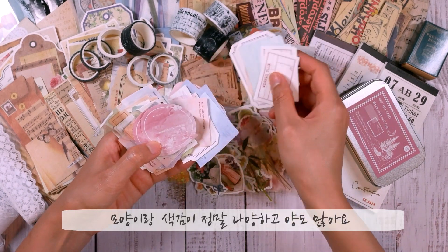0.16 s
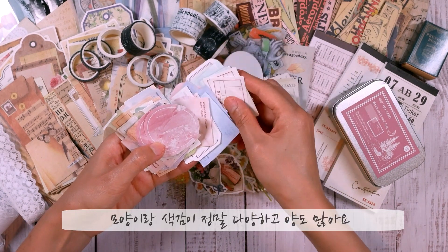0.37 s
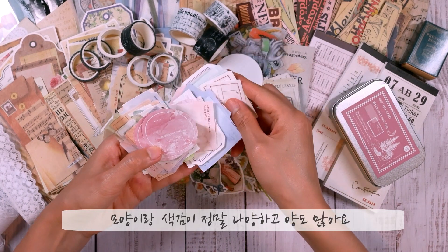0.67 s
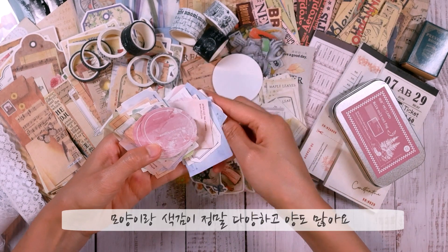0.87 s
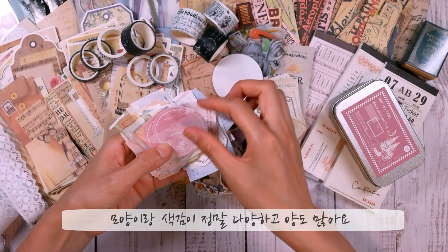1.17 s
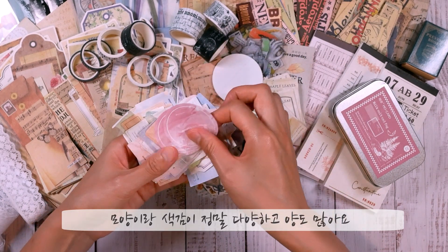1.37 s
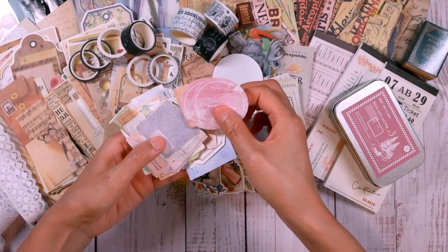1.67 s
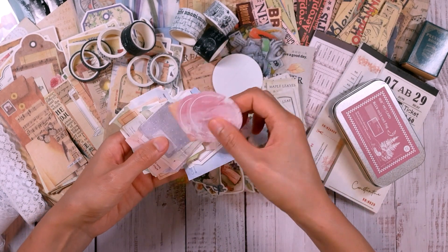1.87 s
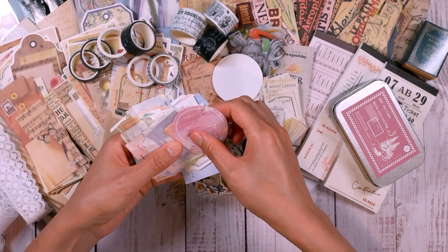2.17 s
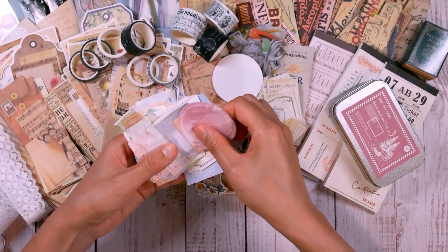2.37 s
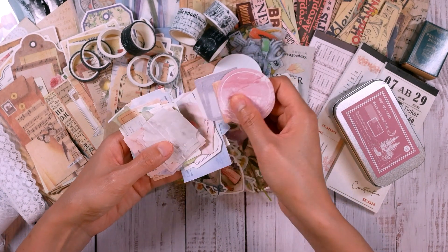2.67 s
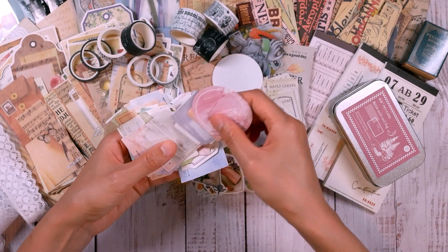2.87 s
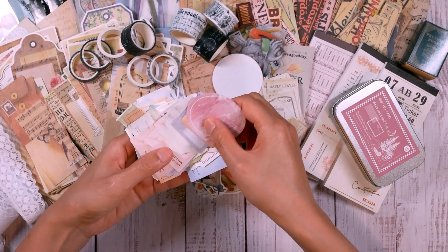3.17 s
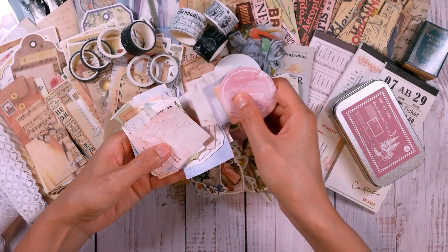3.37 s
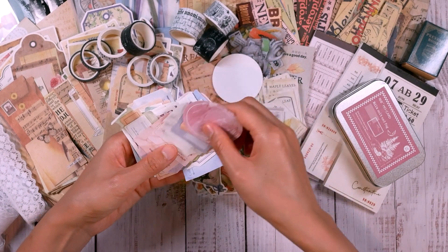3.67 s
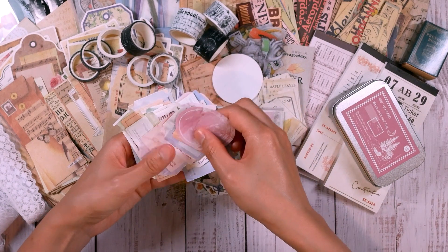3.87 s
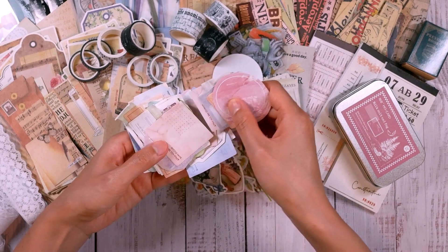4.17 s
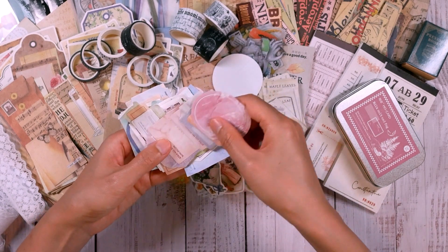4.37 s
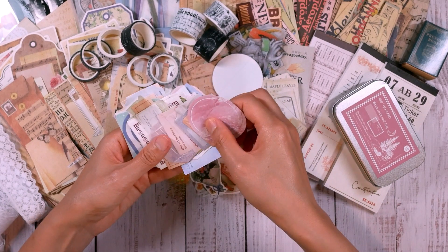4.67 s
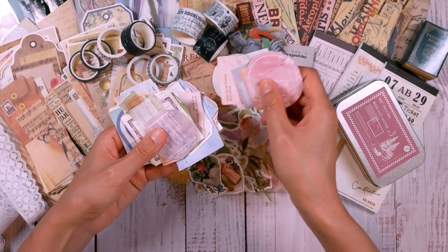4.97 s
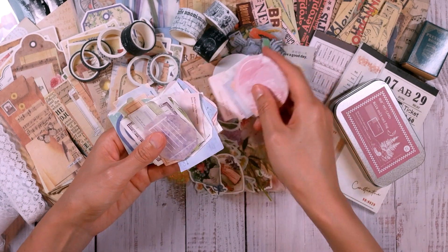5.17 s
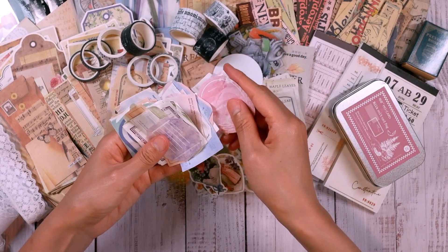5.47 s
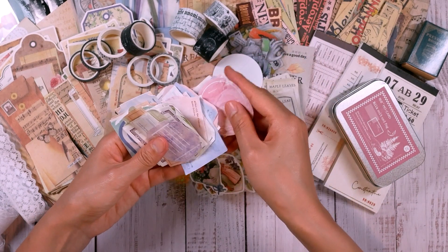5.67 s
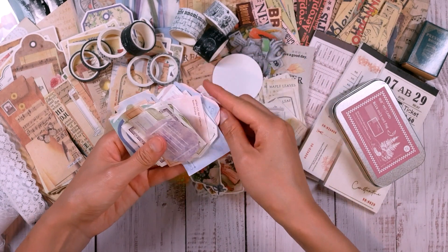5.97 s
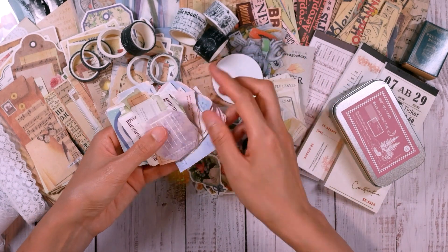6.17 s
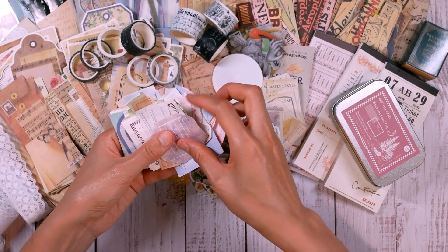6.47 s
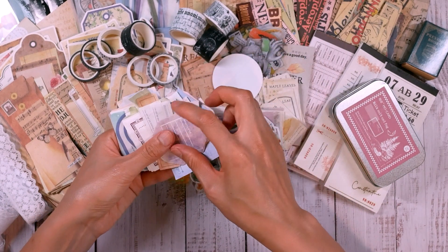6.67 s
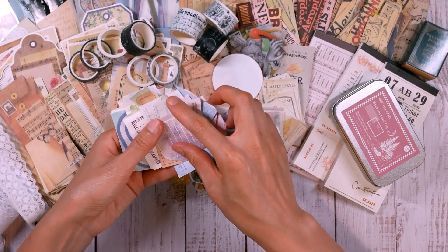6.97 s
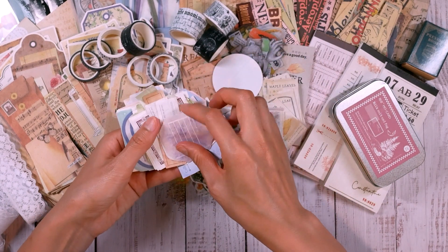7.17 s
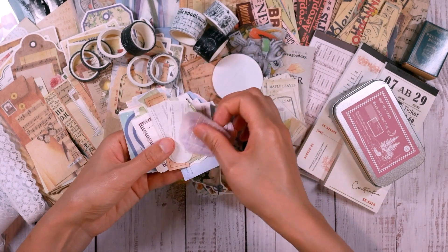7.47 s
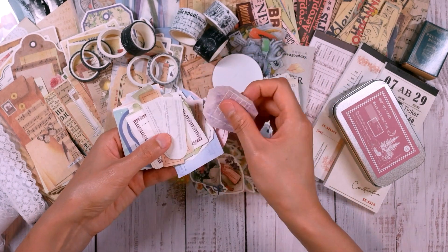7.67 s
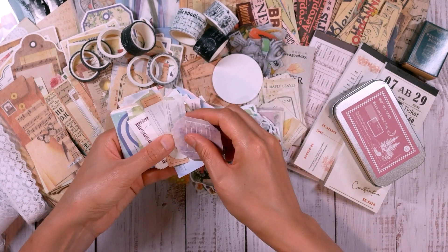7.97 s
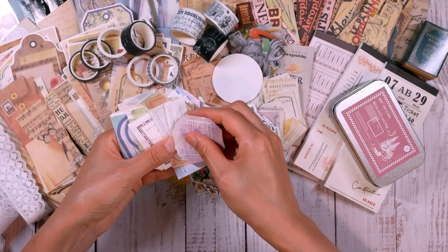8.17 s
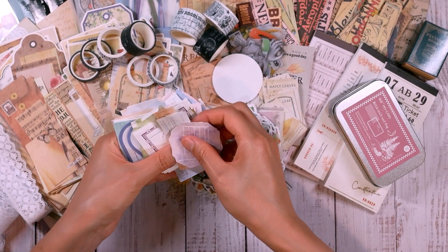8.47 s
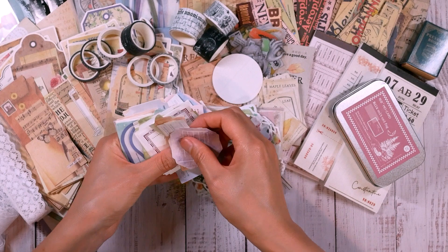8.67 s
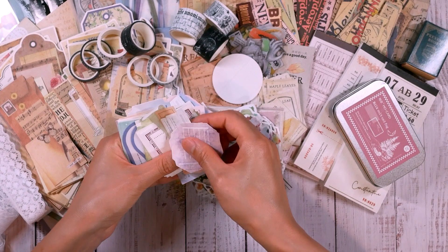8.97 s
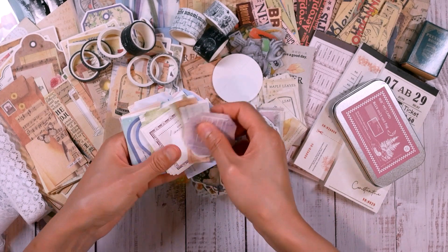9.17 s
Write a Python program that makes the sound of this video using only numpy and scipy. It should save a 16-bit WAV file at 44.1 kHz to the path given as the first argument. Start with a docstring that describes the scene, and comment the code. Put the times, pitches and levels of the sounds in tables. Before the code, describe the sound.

Fingers sort a stack of small paper sheets close by, with soft sliding rustles, crisp flicks and one sharper snap.

```python
"""A desk in a quiet room, a stereo phone close above it: fingers sort a stack of small paper sheets.
Sheets slide over each other in strokes of fine friction; edges slip, or catch and let go in flicks
and one sharp snap. The paper sits just right of centre, and the desk and walls answer briefly.
Behind it lie low room rumble, a faint hum and microphone hiss; the sub-bass sags about once a second."""
import sys
import numpy as np
from scipy import signal
from scipy.fft import rfft, irfft, next_fast_len
from scipy.io import wavfile
from scipy.ndimage import map_coordinates

SR = 44100
rng = np.random.default_rng(int(sys.argv[2]) if len(sys.argv) > 2 else 0)


def dump_mix(stems):
    """Bounce the given channels to the path in sys.argv[1] as a 16-bit WAV at rate SR."""
    frames = np.atleast_2d(stems).T  # one column per channel
    limited = np.clip(frames, -1, 1)  # hard clip at full scale
    pcm = np.round(limited * 32767).astype(np.int16)
    wavfile.write(sys.argv[1], SR, pcm)


N = 411894


def sliding():
    """Paper on paper, close up: fibre hiss, high sheen, scrape and bending flutter follow the hand."""
    # resonances of the sheets in each layer: f/Hz, width/Hz, relative level/dB
    hiss_bands = [(4980, 2450, -3), (6210, 1900, -5), (7900, 2140, -2), (9180, 2660, -3)]
    sheen_bands = [(11100, 4700, 2.5), (13700, 2400, -3)]
    scrape_bands = [(1427, 780, 0), (1824, 620, -3), (2500, 1400, -2), (3060, 1000, -0.5), (3870, 1600, 0)]
    flutter_bands = [(329, 240, -2), (548, 360, -4.5), (828, 240, -1), (1097, 460, -5)]
    hiss, sheen, scrape, flutter = strokes()
    scrape_over_hiss_db = 20 * np.log10(scrape / hiss)
    favour_hz = 2500 * 2 ** (-.04 * scrape_over_hiss_db)  # coarser strokes favour lower resonances
    pressure = undb(1.67 * walk(50)) * catches(per_s=18, size_db=2.3)
    slip_hiss, slip_scrape, rasp = slips()
    hiss = np.hypot(hiss * pressure, slip_hiss)
    sheen = np.hypot(sheen * pressure, undb(-11) * slip_hiss)
    scrape = scrape * pressure
    flutter = np.hypot(flutter * pressure, undb(-4.5) * slip_scrape)
    return (hiss * fibres(hiss_bands, grit_db=2.0, patchy_db=2.5, rate_hz=20)
            + sheen * fibres(sheen_bands, grit_db=0.5, patchy_db=2.0, rate_hz=18)
            + scrape * fibres(scrape_bands, grit_db=3.0, patchy_db=3.0, rate_hz=20, favour_hz=favour_hz)
            + flutter * fibres(flutter_bands, grit_db=5.5, patchy_db=3.5, rate_hz=17)
            + rasp)


def strokes():
    """Each stroke bites, swells or fades along an arch, lets go: gains of hiss, sheen, scrape, flutter."""
    # one sheet drawn over another: t/s, length/s, hiss at start/dB, hiss at end/dB, scrape/dB re hiss,
    # sheen/dB re hiss, dulling/dB (along the stroke the scrape gains this much while the sheen loses)
    hand_strokes = [(0, 0.033, -52.5, -51, -5, -1, 8), (.13, 0.13, -60, -66.5, -10, 0, 3),
                    (.31, 0.077, -76, -63.5, 4, 2, -10), (0.423, 0.067, -58, -54.5, 4, -8, -3.5),
                    (0.569, 0.11, -53, -62, 0, -8, 0), (0.805, 0.13, -55.5, -47.5, -6, -4, 3.5),
                    (1.01, 0.097, -64.5, -58.5, 2.5, -5, 2), (1.23, 0.077, -63.5, -48.5, 1, -9, 0),
                    (1.36, 0.067, -60, -53.5, 4.5, -10, -4.5), (1.5, 0.084, -51.5, -51, -6.5, -14, 0),
                    (1.62, 0.097, -50, -52.5, -9, -4, -2.5), (1.912, .068, -68, -59, 10.5, -10, -7.5),
                    (2.004, 0.12, -42.5, -62.5, -8.5, -9, 10), (2.14, .05, -58, -59, 2, -9, -2),
                    (2.223, .058, -44.5, -61.5, 0.5, -16, -1), (2.399, 0.24, -51.5, -46.5, -4, -9, 1),
                    (2.76, .08, -67, -73, 1, -8, 3), (2.87, 0.18, -61, -51, -1, -3, 1.5),
                    (3.167, 0.22, -50.5, -49, -1.5, -9, -3.5), (3.566, 0.076, -69, -60, 2, -12, -2),
                    (3.685, 0.12, -46.5, -53.5, -6.5, -3.5, 6.5), (3.93, 0.26, -57, -50.5, -0.5, -10, -1),
                    (4.3, 0.063, -67, -66, 3, -6, 0), (4.47, 0.14, -48.5, -58, 1, -6, 3.5),
                    (4.646, 0.049, -53, -50, 2.5, -10, 1), (4.708, .05, -58, -58, 11, -6, -4),
                    (4.775, 0.13, -52.5, -46, 3.5, -7.5, -5), (5.003, 0.079, -65, -56.5, -0.5, -4, 0),
                    (5.245, 0.13, -57, -69, -11, -4, 5), (5.417, 0.058, -50.5, -51, 1.5, -8, -1),
                    (5.542, 0.098, -58.5, -57, 0.5, -3, 6.5), (5.667, 0.14, -59, -56.5, 4.5, -6, -7),
                    (5.9, .13, -50.5, -51, -2.5, -2, 2.5), (6.134, 0.075, -56.5, -66, 1, -8, 3),
                    (6.263, 0.092, -68, -61, 9.5, -4, 0.5), (6.445, 0.022, -53.5, -67, 8.5, -14, -2),
                    (6.585, 0.12, -66, -65.5, 8.5, -5, -3), (6.753, .167, -59, -61, 0, -9, 1.5),
                    (7.045, .16, -64, -70, 4.5, -1, 0), (7.266, 0.21, -52.5, -49.5, 1, -8, -1.5),
                    (7.505, 0.14, -42.5, -43.5, -8.5, -2.5, 7), (7.738, 0.16, -67, -69, -6, -7, -6),
                    (7.92, 0.18, -60.5, -74, 6, -9, 2), (8.12, 0.068, -71, -63, 6, -10, 0),
                    (8.272, 0.042, -63.5, -68, 9.5, -8, 1.5), (8.399, .12, -65, -53, 5, -9, -2),
                    (8.538, 0.085, -57.5, -67, 6, -9, 2), (8.66, 0.25, -58.5, -59.5, 2, -10, 1.5),
                    (8.939, .04, -53, -57, -0.5, -13, 5), (9.048, .13, -64, -50, 3, -9, -4),
                    (9.2, 0.13, -52.5, -55.5, -0.5, -7, 0)]
    # the held stack never lies quite still: hiss/dB, sheen/dB, scrape/dB, flutter/dB
    resting_db = [-79, -79, -68, -69.5]
    grip_db_per_s, release_db_per_s, arch_db = 450, 425, 0.5
    t = np.arange(N) / SR
    power = undb(resting_db)[:, None] ** 2 * np.ones(N)
    for start, length, start_db, end_db, scrape_db, sheen_db, dull_db in hand_strokes:
        near = slice(max(int((start - .2) * SR), 0), int((start + length + .2) * SR))
        age = t[near] - start
        along = np.clip(age / length, 0, 1)
        hiss = start_db + (end_db - start_db) * along + arch_db * np.sin(np.pi * along)
        hiss -= grip_db_per_s * np.maximum(-age, 0) + release_db_per_s * np.maximum(age - length, 0)
        scrape = hiss + scrape_db + dull_db * along
        flutter = -60.5 + 0.57 * (scrape + 55)  # grows more slowly than the scrape
        sheen = hiss + sheen_db - 0.54 * dull_db * along
        sheen += 0.35 * (hiss - max(start_db, end_db))  # fades faster than the hiss
        power[:, near] += undb([hiss, sheen, scrape, flutter]) ** 2
    return np.sqrt(power)


def fibres(bands, grit_db, patchy_db, rate_hz, favour_hz=None):
    """Dense micro-slips of uneven size; each resonance of the sheets waxes and wanes as the grip shifts."""
    sizes = undb(grit_db * np.minimum(rng.exponential(size=N), 4))
    out, power = 0, 0
    for hz, width_hz, db in bands:
        peak = np.concatenate(signal.iirpeak(hz, hz / width_hz, SR))
        band = signal.sosfilt([peak, peak], sizes * rng.standard_normal(N))
        if favour_hz is not None:
            db = db - 4.5 * np.log2(hz / favour_hz) ** 2  # 4.5 dB down one octave away
        out += level(band, 0) * undb(db + patchy_db * walk(rate_hz))
        power += undb(db) ** 2
    return level(out / np.sqrt(power), 0)


def catches(per_s, size_db):
    """Edges snag at random while sheets slide: brief jumps of contact pressure."""
    snags = (rng.random(N) < per_s / SR) * undb(size_db * rng.exponential(size=N).clip(0, 3))
    return 1 + signal.lfilter([1], [1, -np.exp(-1 / (0.0019 * SR))], snags)


def slips(size=2048):
    """An edge zips briefly over its neighbour: hiss envelope, scrape envelope and pitched rasp."""
    # short slips: t/s, length/ms, hiss/dB, scrape/dB, rasp f/Hz
    edge_slips = [(0.018, 7.5, -44, -60, 3000), (0.035, 12.3, -59, -41.5, 1430),
                  (0.297, 4.8, -49, -35.5, 1600), (0.367, 14, -55, -61, 2600), (0.43, 12, -42.5, -55, 2500),
                  (1.076, 3, -44, -65, 1800), (1.354, 8.2, -58, -47, 3800), (1.399, 9.6, -45, -56, 3200),
                  (1.411, 2.4, -48, -56, 3200), (1.734, 12.6, -52, -55, 2000),
                  (1.854, 13.5, -53, -50, 1500), (1.903, 5.4, -52, -49, 1800), (1.918, 5.4, -45, -47, 2000),
                  (1.947, 8.7, -44.5, -49, 1500), (1.965, 2.3, -46, -54, 2500),
                  (1.989, 15.5, -36.5, -41.5, 4230), (2.078, 2.5, -52, -53, 1900),
                  (2.102, 4.5, -46, -69, 1400), (2.216, 4.1, -34.5, -28.5, 3140),
                  (2.62, 2.0, -41, -54, 1800), (2.628, 4.2, -54, -34, 2100), (2.763, 3.3, -45, -50, 1600),
                  (3.314, 2.1, -42, -61, 3600), (3.387, 6.5, -45, -45, 1410),
                  (3.552, 6.6, -52, -43.5, 2600), (3.575, 3.4, -58, -47, 3500),
                  (3.586, 3.2, -60, -46.5, 1400), (3.614, 8.8, -50.5, -48.5, 1400),
                  (4.44, 6.9, -46, -52, 1600), (4.493, 3.7, -42, -40, 2400), (4.502, 1.7, -38, -53, 3100),
                  (4.521, 1.6, -36, -52, 3700), (4.882, 5.2, -54, -48, 1400),
                  (4.909, 6.8, -41, -38.5, 1900), (5.414, 6.4, -50, -48, 3200),
                  (5.432, 3.8, -56, -40.5, 3100), (5.469, 12.4, -53, -48.5, 2900),
                  (5.551, 16, -50, -67, 3400), (5.672, 6.5, -54, -55, 1600), (5.682, 8.1, -54, -49.5, 2600),
                  (5.726, 4.8, -58, -49, 1400), (5.747, 3, -39.5, -47, 1800), (6.016, 7.1, -54, -52, 1800),
                  (6.133, 10, -52, -53, 1600), (6.342, 7.2, -44, -48, 1600), (6.438, 3.8, -36, -32.5, 1800),
                  (6.772, 10, -46, -46.5, 1800), (6.856, 1.9, -44, -66, 3100),
                  (6.91, 7.6, -46.5, -48, 1710), (7.134, 2.3, -46, -52, 1700), (7.312, 6, -39, -43, 3000),
                  (7.386, 2.4, -33.5, -37, 3000), (7.588, 4.3, -41, -57, 2100),
                  (7.786, 9.1, -72, -54, 2000), (7.84, 8.8, -70, -52, 2000), (7.931, 5.3, -54, -46.5, 2400),
                  (8.259, 9.9, -57, -51, 2100), (8.36, 11, -61, -50.5, 1800), (8.471, 12.7, -51, -65, 3100),
                  (8.594, 4.6, -46.5, -41, 1820), (8.671, 9, -47.5, -51, 2410),
                  (8.711, 12, -50.5, -52, 2900), (8.749, 1.7, -52, -50, 2000),
                  (8.856, 4.7, -50, -42.5, 3000), (8.868, 5.6, -42.5, -39.5, 2370),
                  (8.908, 26, -45, -46, 1900), (8.937, 7.2, -36, -29, 2400), (8.955, 3.8, -51, -39, 2820),
                  (9.17, 7.0, -45, -61, 3600), (9.199, 12.4, -43, -40, 2200), (9.298, 6.7, -57, -48, 2900)]
    out = np.zeros((3, N + size))
    t = np.arange(size) / SR
    for start, ms, hiss_db, scrape_db, hz in edge_slips:
        onset = 1 - np.exp(-t / 0.0011)
        shape = onset * np.exp(-np.maximum(t - ms / 1000, 0) / 0.0012)
        rasp = level(signal.lfilter(*signal.iirpeak(hz, 2.5, SR), rng.standard_normal(size)), scrape_db)
        at = int(start * SR)
        out[:, at:at + size] += [shape * undb(hiss_db), shape * undb(scrape_db), shape * rasp]
    return out[:, :N]


def flicks(size=4096):
    """Edges let go one by one; once a stiff sheet snaps at two corners, rings on and scrapes into place."""
    # edges letting go: t/s, ring level/dB, ring f/Hz, tick/dB re ring, air thump/dB re ring
    releases = [(0.0384, -31.5, 480, -10, -5.5), (0.2994, -24, 980, -13, -21),
                (0.6008, -34.5, 810, -10, -19), (0.632, -36, 990, -10, -4), (1.078, -36.5, 543, 8, -7),
                (1.401, -38, 3060, -2, -6), (1.7362, -44, 1810, -4, -15), (1.904, -41, 685, -5, -11),
                (2.1048, -38, 850, 2, -6), (2.2171, -22.5, 840, 9.5, -20), (2.6296, -24, 1880, -16, -11),
                (2.7639, -32, 890, -2, -23), (3.3895, -28, 1330, -10, -16), (3.553, -40, 2430, -15, -16),
                (3.6161, -34, 1250, -11, -12), (4.1874, -20.5, 1190, -23, -37),
                (4.2197, -27, 760, -6, -3.5), (4.8834, -32, 1250, -11, -23), (4.9116, -24.5, 685, 5, -13),
                (4.928, -34.5, 656, -12, 0), (5.0866, -39, 1240, -15, -13), (5.418, -30, 3120, -7, -7),
                (5.479, -41, 1240, -3, 7.5), (5.6737, -32, 1430, 3, -12), (5.833, -31.5, 2800, -7, -18),
                (6.1608, -33.5, 1660, -17, -11), (6.347, -35, 1740, 1, -4.5), (6.4379, -27, 630, -7, -10),
                (6.439, -24.5, 1330, 1.5, 0), (6.6796, -33.5, 1870, -4, -10), (6.778, -38.5, 830, 2, -5),
                (6.9163, -28, 725, -15, -15), (7.133, -35.5, 1730, 9, -21), (7.3158, -29, 845, 9.5, 0.5),
                (7.3885, -26, 750, -2, -0.5), (7.6478, -32, 1350, -9, -4), (8.364, -39, 1670, -11, -3.5),
                (8.5965, -25.5, 880, -17, -13), (8.7493, -37, 790, -7.5, -11), (8.87, -28, 710, -9, -19),
                (8.9421, -19.5, 830, -14, -4), (8.943, -25.5, 820, -17, -38),
                (9.2045, -24.5, 930, -17, -28), (9.209, -22.5, 680, -17, -10)]
    # the two corners of the snap: ring level/dB, ring f/Hz, tick/dB re ring, air thump/dB re ring
    corners = [(-6.5, 2440, 1, -39), (-4.5, 2000, 6, -23.5)]
    # resonances of the stiff sheet: f/Hz, width/Hz, level/dB
    stiff_modes = [(863, 127, -21.5), (1940, 250, -29), (2560, 200, -24), (3050, 340, -13)]
    snap_s, corner_gap_s = 4.69165, .00232
    t = np.arange(size) / SR
    body = struck(stiff_modes)
    settle = level(signal.lfilter(*signal.iirpeak(2800, .8, SR), rng.standard_normal(size)), -33.5)
    settle *= np.clip(t / .009, 0, 1) ** 2 * np.exp(-t / 0.025)
    sounds = [(start, flick(*edge)) for start, *edge in releases]
    sounds += [(snap_s + k * corner_gap_s, flick(*corner) + body) for k, corner in enumerate(corners)]
    sounds.append((snap_s, settle))
    out = np.zeros(N + size)
    for start, sound in sounds:
        at = int(start * SR)
        out[at:at + size] += sound
    return out[:N]


def flick(db, hz, tick_db, thump_db):
    """A released edge ticks, rings its sheet for a few cycles, pushes air and pats the stack."""
    # resonances of the edge tick: f/Hz, width/Hz, relative level/dB
    tick_modes = [(2390, 1400, -8), (4660, 1800, -3), (9240, 970, 6), (12500, 2700, 3.5)]
    ring_cycles = 4.85
    tick = struck(tick_modes)
    tick *= undb(tick_db) / np.abs(tick).max()
    # a buckling sheet rings at its main bend and a weaker, shorter higher one
    width_hz = 2 * hz / ring_cycles
    sheet = ring(hz, width_hz) + .5 * ring(2 * hz, 2 * width_hz)
    # a small sheet radiates little below its bend
    crisp = signal.lfilter(*signal.butter(1, 0.22 * hz, "high", fs=SR), sheet - tick)
    air = ring(hz=143, width_hz=360)
    pat = undb(-5) * ring(hz=350, width_hz=230)
    return undb(db) * (undb(thump_db) * (air + pat) + crisp)


def echoes(paper):
    """A quick bounce off the desk clutter, then the walls: a short dull tail, different at each mic."""
    echo_db, t60_s, build_s = -8.5, 0.11, 0.0091
    t = np.arange(int(.2 * SR)) / SR
    walls = np.exp(-np.log(1000) * t / t60_s) * np.clip(t / build_s, 0, 1) ** 3
    desk = 1.37 * np.exp(-t / 0.0035) * (t > .0005)
    tone = [(200, -3.5), (2500, -12.5), (8000, -6.5), (15000, -11.5)]  # f/Hz, relative level/dB
    tail = colour(rng.standard_normal((2, len(t))), tone) * (walls + desk)
    tail /= np.sqrt(np.sum(tail ** 2, axis=1, keepdims=True))
    return undb(echo_db) * signal.fftconvolve(paper[None], tail, axes=1)[:, :N]


def room():
    """Room tone and mic hiss, narrower in the bass, with a slowly swelling rumble and a wavering hum."""
    # spectrum of the steady noise floor: f/Hz, relative density/dB
    floor_spectrum = [(7.1, -10), (12, 2), (48, -1), (244, -15), (517, -21.5), (619, -20), (916, -24.5),
                      (1070, -25.5), (1480, -26.5), (2330, -29), (3550, -30.5), (4800, -32), (16000, -38.5)]
    # its stereo width: f/Hz, side minus mid/dB
    side_spectrum = [(30, -8.5), (200, -2), (1000, -2), (8000, 0), (15000, 2.5)]
    size = next_fast_len(N)
    mid = colour(rng.standard_normal(size), floor_spectrum)[:N]
    side = colour(rng.standard_normal(size), floor_spectrum, side_spectrum)[:N]
    floor = undb(-49) / mid.std() * np.array([mid + side, mid - side])
    hum = signal.fftconvolve(rng.standard_normal(N), ring(hz=239.6, width_hz=8.2, size=8192))[:N]
    rumble = signal.fftconvolve(rng.standard_normal(N), ring(hz=95, width_hz=58))[:N]
    rumble *= undb(2.7 * walk(2.1))
    return floor + level(hum, -63.5) + level(rumble, -59.5)


def sag():
    """Soft sub-bass dips, the same in both channels, each followed by a slow swing back."""
    # middle of each dip: t/s
    dip_times = [.591, 1.685, 2.76, 3.841, 4.933, 5.774, 6.858, 7.94, 9.035]
    dip_db, dip_s, recover_hz = -39, .055, .8
    t = np.arange(N) / SR
    dips = sum(np.exp(-((t - middle) / (dip_s / 2)) ** 4) for middle in dip_times)
    return -undb(dip_db) * signal.lfilter(*signal.butter(1, recover_hz, "high", fs=SR), dips)


def ring(hz, width_hz, size=4096):
    """A damped resonance struck once, peak 1."""
    t = np.arange(size) / SR
    wave = np.sin(2 * np.pi * hz * t) * np.exp(-np.pi * width_hz * t)
    return wave / wave.max()


def struck(modes):
    """Several resonances struck together, alternating in polarity."""
    return sum((-1) ** k * undb(db) * ring(hz, width_hz) for k, (hz, width_hz, db) in enumerate(modes))


def walk(rate_hz):
    """Random values 1 / rate_hz seconds apart, joined by straight lines; spread near 1."""
    count = int(N / SR * rate_hz) + 2
    return map_coordinates(rng.standard_normal(count), [np.arange(N) * rate_hz / SR], order=1)


def colour(x, *spectra):
    """Filter by the sum of spectra given as f/Hz, level/dB."""
    log_f = np.log(np.maximum(np.fft.rfftfreq(x.shape[-1], 1 / SR), 1))
    db = sum(np.interp(log_f, np.log(points[:, 0]), points[:, 1]) for points in map(np.array, spectra))
    return irfft(rfft(x) * undb(db), x.shape[-1])


def level(x, db):
    """Scale to an rms level."""
    return x * undb(db) / np.sqrt(np.mean(x ** 2))


def undb(db):
    """Decibels to amplitude."""
    return 10 ** (np.asarray(db) / 20)


def scene():
    """Paper close under the phone, just right of centre: the right mic hears it first and louder."""
    half_lag_samples, right_lead_db = .22, 0.8
    left_right = np.array([[-1], [1]])
    paper = sliding() + flicks()
    direct = paper + left_right * half_lag_samples * np.gradient(paper)
    direct *= undb(left_right * right_lead_db / 2)
    return direct + echoes(paper) + room() + sag()


def record(dry):
    """The phone adds a small offset, rounds the loudest peak and cuts the top."""
    offset, ceiling, top_hz = -0.0021, .9, 15750
    rounded = ceiling * np.tanh((dry + offset) / ceiling)
    return signal.sosfilt(signal.ellip(10, .2, 80, top_hz, fs=SR, output="sos"), rounded)


dry = scene()
out = record(dry)
dump_mix(out)
```